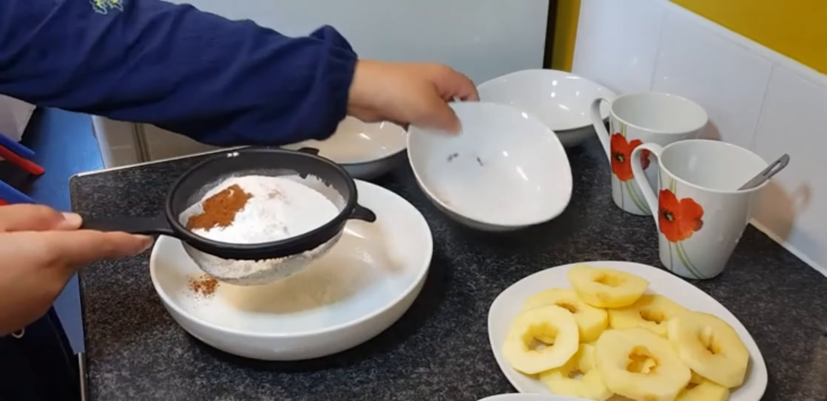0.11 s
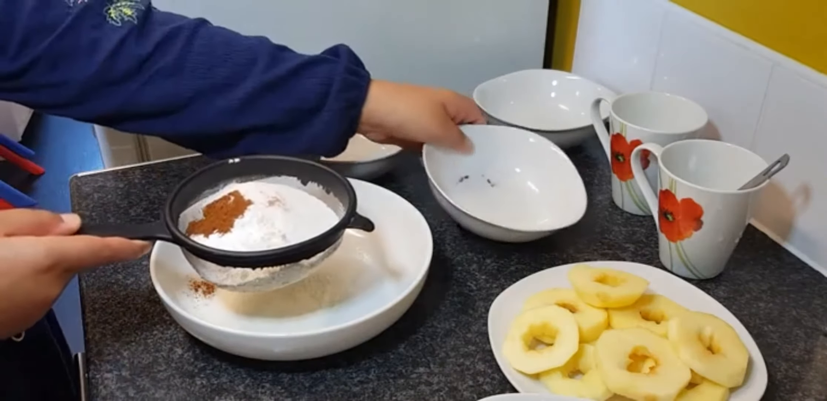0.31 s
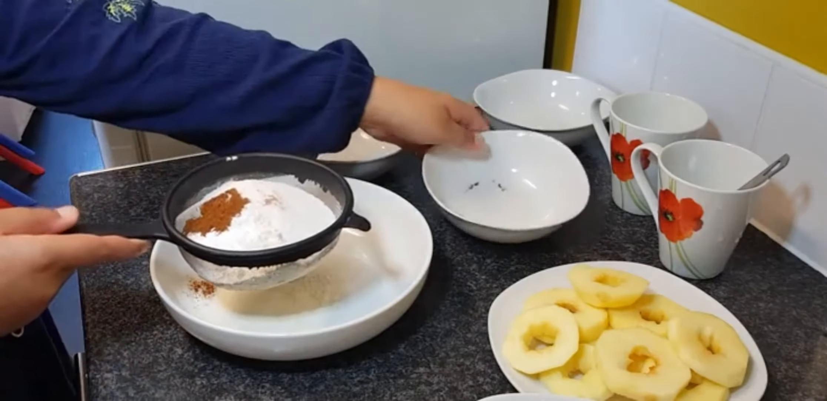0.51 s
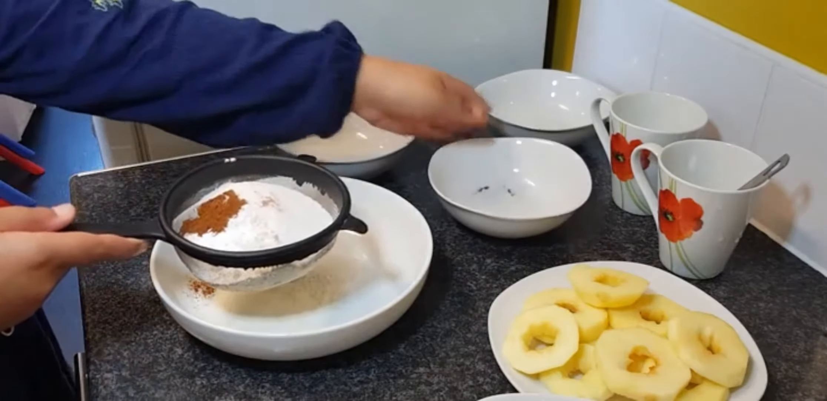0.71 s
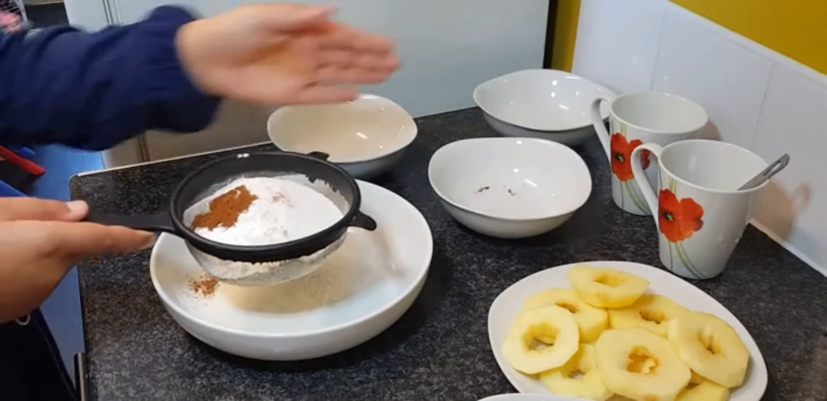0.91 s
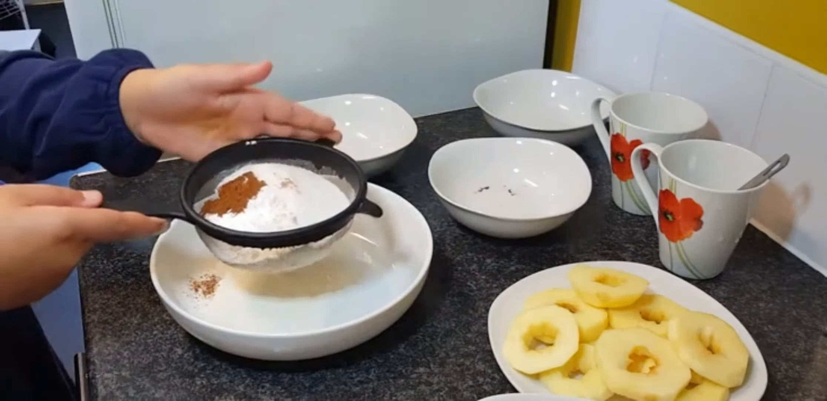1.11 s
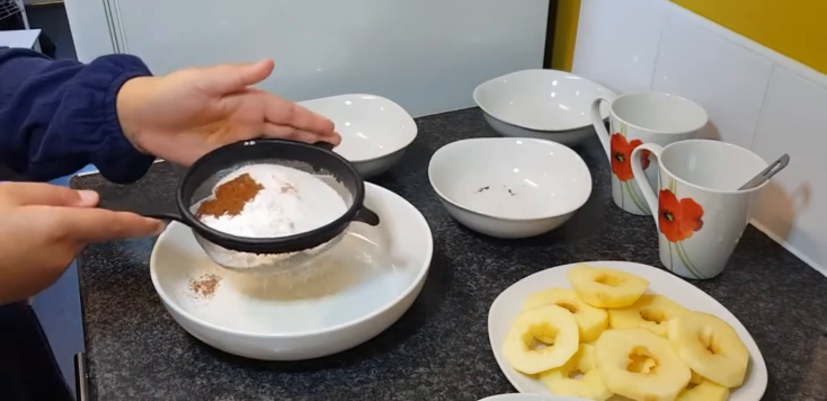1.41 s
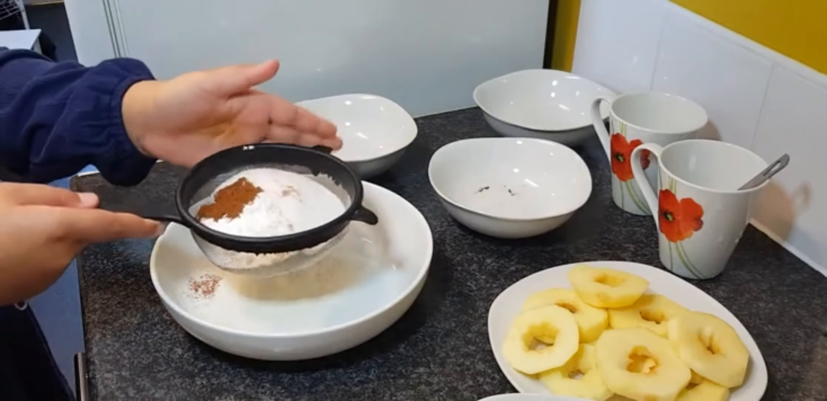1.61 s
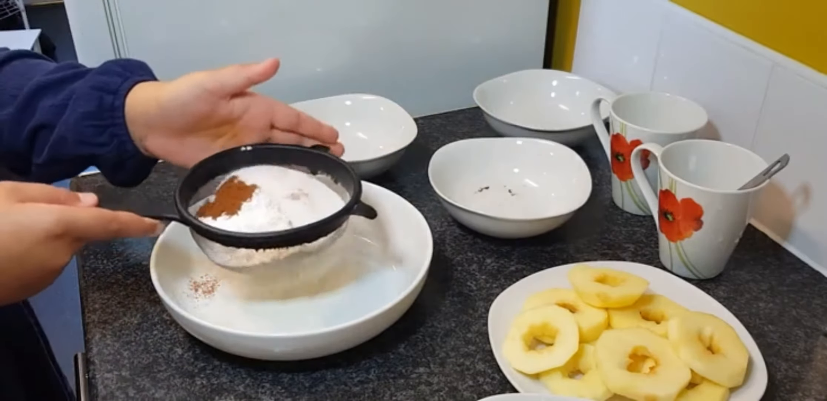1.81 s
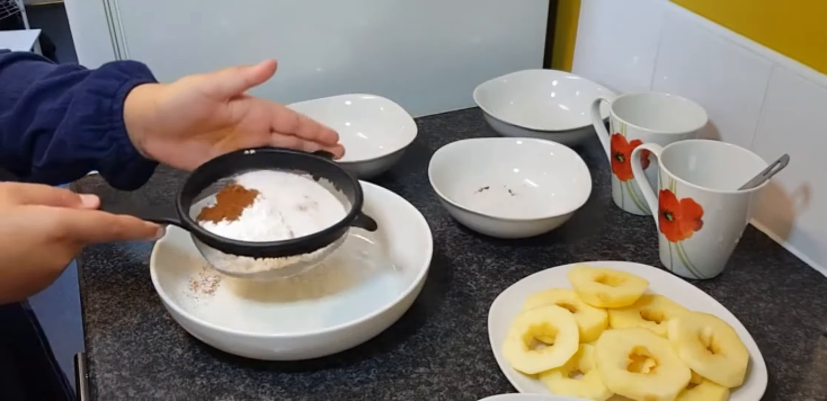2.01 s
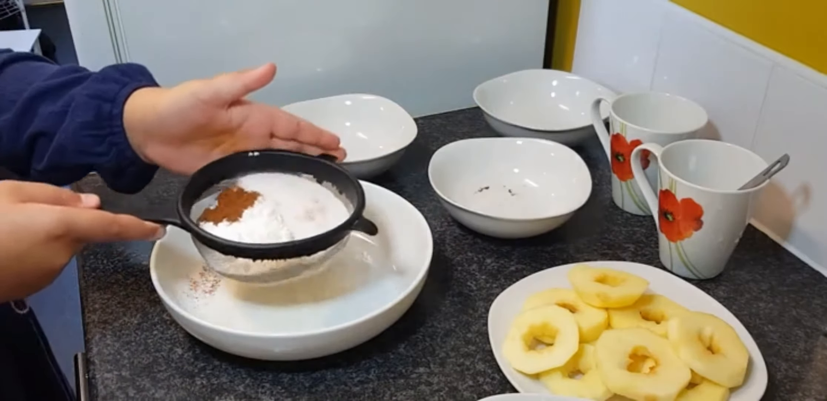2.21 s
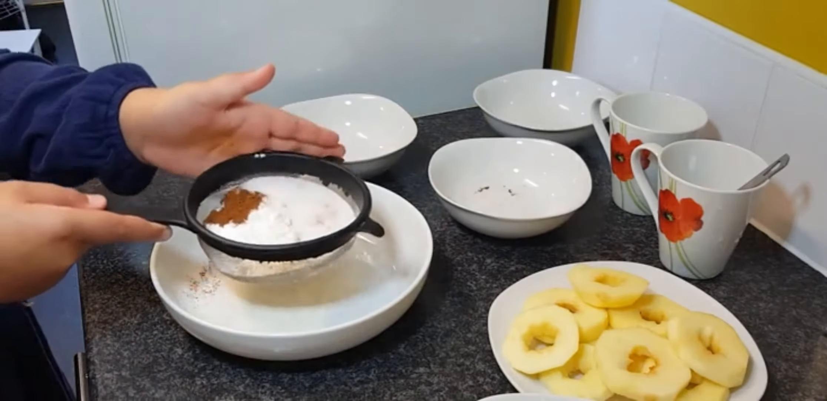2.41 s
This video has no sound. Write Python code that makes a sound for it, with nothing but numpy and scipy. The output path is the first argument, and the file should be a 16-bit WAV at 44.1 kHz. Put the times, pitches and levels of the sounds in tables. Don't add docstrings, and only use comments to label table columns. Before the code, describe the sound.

A ceramic bowl knocks firmly on a kitchen worktop, then rocks and settles with three thuds

```python
import sys
import numpy as np
from scipy import signal
from scipy.fft import rfft, irfft
from scipy.io import wavfile
from scipy.ndimage import uniform_filter1d

SR = 44100
rng = np.random.default_rng(int(sys.argv[2]) if len(sys.argv) > 2 else 0)


def boost(x):
    u = np.asarray(x, float) / 20
    return 10 ** u


def wav_out(sig):
    wavfile.write(sys.argv[1], SR, np.round(np.clip(np.atleast_2d(sig).T, -1, 1) * 32767).astype(np.int16))


N = 114660

# frequency in Hz, density in dB per Hz.
HISS_SPECTRUM = [(250, -8.5), (1200, -11.5), (1450, -3.5), (2050, -4), (2400, -16.5), (3200, -19.5),
                 (3500, -8), (15800, -18.5)]
# frequency in Hz, width in Hz, height in dB.
HISS_PEAKS = [(345, 3.2, 21.5), (1619, 57, 8.5), (1882, 84, 9.5), (4310, 330, 8.5), (4620, 1120, -7.5),
              (6508, 164, 16.5), (6900, 1000, -3.5), (8320, 1040, 7), (9710, 200, 9), (10070, 140, -15),
              (11030, 400, 12), (13500, 1900, 1), (15060, 290, 7)]
# time in seconds, gain in dB.
HISS_GAIN = [(0, 7), (.2, 8), (.3, 2.5), (0.901, 2), (1.5, 1), (2.6, 1)]
# frequency in Hz, density in dB per Hz.
RUMBLE_SPECTRUM = [(15, -49), (25, -21.5), (86, 0.5), (124, -8), (222, -7.5), (309, -18.5), (341, -13.5),
                   (370, -14.5), (1300, -25.5), (1690, -74.5), (2860, -120)]
# frequency in Hz, width in Hz, height in dB.
RUMBLE_PEAKS = [(44, 8, 11.5), (84.4, 6.07, 3), (100.5, 5.9, 18.5), (173.6, 22, 1), (212.5, 30, 5)]
# time in seconds, gain in dB.
RUMBLE_GAIN = [(0, 3), (.9, 3.5), (1.298, 2.5), (1.701, -0.5), (2.6, -0.5)]
# frequency in Hz, likeness from -1 to 1.
FLOOR_SAME = [(60, 0.89), (180, 0.97), (550, 0.67), (1650, 0.031), (4970, -0.15), (15000, -0.047)]
# frequency in Hz, left over right in dB.
FLOOR_LEAN = [(60, -1), (180, 0), (550, 2.5), (1650, 1.5), (4970, 5), (15000, -2)]
# frequency in Hz, phase lag of the right port in radians.
FLOOR_TURN = [(60, .05), (500, .2), (1500, 1.74), (15000, 2.8)]

# start in seconds, length in seconds, level in
# dB.
SWELLS = [
    (0.202, 0.015, -31),
    (0.572, 0.016, -35.5),
]
# start in seconds, strength in dB, cabinet boom in dB, bowl overtones in dB,
# part that strikes (0 rim, 1 foot, 2 heel of the foot, 3 whole foot).
KNOCKS = [
    (0.2169, -5, -7, -51, 0),
    (0.2826, -21.5, -20, -70, 0),
    (.5912, -15, -12, -43, 2),
    (0.6413, -9, -19.5, -37, 1),
    (0.6955, -9.5, -12, -38, 3),
    (0.2961, -23, -43, -79, 1),
    (.388, -46, -31, -73, 0),
    (0.27, -23, -31.5, -75, 0),
    (.307, -23.5, -27.5, -75, 1),
    (.664, -26, -30, -55, 2),
]
REST_DB = [-56, -70, -50, -45, -34, -70, -70, -70, -70, -70]
# start and length of the drop in seconds, worktop and boom in dB.
DROP = (.314, .014, -5, -11)

# frequency in Hz, level in dB, t60 in seconds.
TOP_RIM = [(142.5, -4, 0.12), (213.6, -9, 0.23), (420, -3.5, 0.05), (481.3, -2.5, 0.086),
           (622, -16.5, 0.22), (825, -3, 0.049), (1043, -8, 0.13), (1145, -6.5, 0.076), (1487, -8, 0.048),
           (1664, 0, 0.033), (2194, -11, 0.049), (2580, -14.5, 0.029)]
# frequency in Hz, level in dB, t60 in seconds.
TOP_FOOT = [(144.3, -6.5, 0.14), (217.7, -9, 0.15), (278.7, -14, 0.15), (460, -3.5, 0.092),
            (620.5, -12.5, 0.17), (653, -23, 0.12), (807, -12.5, 0.17), (1010, -18, 0.055),
            (1058, -15.5, 0.15), (1190, -3.5, 0.078), (1378, -12, 0.071), (1516, -5, 0.04),
            (1715, -23, 0.14), (2137, -16, 0.03)]
# frequency in Hz, level in dB, t60 in seconds.
TOP_HEEL = [(149, -4.5, 0.11), (220, -11, 0.19), (456, -21, 0.072), (613, -8.5, 0.14), (655.5, -10, 0.16),
            (817, -9.5, 0.1), (927, -13, 0.11), (1038, -9, .12), (1187, -3.5, .09), (1238, -9.5, 0.12),
            (1500, -17.5, 0.04), (2140, -17.5, 0.045), (2444, -25, .04)]
# frequency in Hz, level in dB, t60 in seconds.
TOP_FLAT = [(145.8, -5, 0.138), (214, -9.5, 0.14), (418.4, -6, .12), (493, -10, 0.12), (654, -12.5, 0.144),
            (814, -9, 0.13), (1012, -12, 0.12), (1197, -0.5, 0.094), (1331, -3.5, 0.079), (1450, -8, 0.046),
            (1712, -16.5, .18), (2133, -18, 0.15), (2340, -13, .03), (3550, -16, .05)]
# frequency in Hz, level in dB, t60 in seconds.
RIM_MODES = [(3620, 9, 0.13), (5420, -17.5, 0.083), (6310, -2, 0.11), (9930, -9.5, 0.12),
             (11060, -3.5, 0.13)]
# frequency in Hz, density in dB per
# Hz.
RATTLE_FOOT = [(180, -31), (300, -6.5), (1180, -4.5), (2790, -24), (6150, -41), (7370, -53), (9930, -38),
               (15500, -54)]
# frequency in Hz, density in dB per Hz.
RATTLE_RIM = [(150, -55), (250, 1), (474, -1.5), (852, -8), (1050, -5.5), (2530, -19), (3330, -29.5),
              (15500, -58.5)]
# frequency in Hz, density in dB per Hz.
GRIT_SPECTRUM = [(1500, -2.5), (2500, 1.5), (5000, -4), (8000, -9.5), (12000, -12.5), (15500, -12.5)]
# frequency in Hz, level in dB, t60 in seconds.
BOOM_MODES = [(76.55, -2.5, 0.31), (92.5, -5, 0.21)]
# frequency in Hz, level in dB, t60 in seconds.
BOWL_MODES = [(6019, -6, .25), (6270, -5, .25), (6767, -12, .15), (9803, 0, .3), (10100, -1, .22),
              (13750, -10, .15), (14300, -8, .18), (15050, -8, .18)]
# frequency in Hz, level in dB, t60 in seconds.
REST_MODES = [(1168, 0, .95), (1130, -3, .72), (2503, -9, .52)]

# frequency in Hz, left over right in dB.
PORT_LEAN = [(70, -3.5), (200, 1.5), (400, 1), (1200, 4), (2200, -0.5), (4500, 1), (10000, -2)]
# frequency in Hz, phase between the ports in radians.
PORT_TURN = [(70, 0.086), (400, 0.42), (1200, 1.54), (2500, 1.6), (10000, 1.87)]
# frequency in Hz, t60 in seconds.
KITCHEN_T60 = [(80, 0.68), (400, 0.25), (1100, 0.37), (3000, 0.4), (8000, 0.2)]
# frequency in Hz, gain of the kitchen in dB.
KITCHEN_COLOUR = [(100, 2.5), (250, -8.5), (450, 3), (1200, -0.5), (3000, -8.5), (10000, 0)]
# frequency in Hz, likeness of the reverberation at the two ports.
KITCHEN_SAME = [(60, 0.935), (180, 0.78), (550, 0.56), (1650, -0.15), (4970, 0.19), (15000, 0.95)]
# time in seconds, gain in dB.
DUCK = [(0, 0), (.31, 0), (.34, -3), (.55, -3), (.58, 0), (2.6, 0)]


def evened(x):
    return x / np.sqrt(np.mean(x ** 2) + 1e-20)


def read(points, hz):
    f, value = np.transpose(points)
    return np.interp(np.log(hz + 1), np.log(f + 1), value)


def fader(points):
    return boost(np.interp(np.arange(N) / SR, *np.transpose(points)))


def colour(x, points):
    return irfft(rfft(x) * boost(read(points, np.fft.rfftfreq(len(x), 1 / SR))), len(x))


def add(mix, s, sound):
    part = mix[round(s * SR):][:len(sound)]
    part += sound[:len(part)]


def room_floor(points, peaks, low_hz, high_hz, patchy_db):
    frames, hz = N // 1024 + 5, np.fft.rfftfreq(4096, 1 / SR)
    a, b, c, d, patches = rng.standard_normal((frames, 2049, 5)).T
    patches = uniform_filter1d(patches, size=30, axis=0)
    patches = evened(uniform_filter1d(patches, size=3, axis=1))
    db = read(points, hz) + sum(g / (1 + (2 * (hz - f) / w) ** 2) for f, w, g in peaks)
    same = np.clip(read(FLOOR_SAME, hz), 0, 1)[:, None]
    left = a + 1j * b
    right = same * left + np.sqrt(1 - same ** 2) * (c + 1j * d)
    right = right * (boost(-read(FLOOR_LEAN, hz)) * np.exp(-1j * read(FLOOR_TURN, hz)))[:, None]
    band = ((hz > low_hz) & (hz < high_hz))[:, None]
    z = np.array([left, right]) * boost(db[:, None] + patchy_db * patches) * band
    return evened(signal.istft(z, nperseg=4096, noverlap=3072)[1][:, :N])


def appliance_hiss():
    return boost(-57.5) * fader(HISS_GAIN) * room_floor(HISS_SPECTRUM, HISS_PEAKS, 200, 16100, patchy_db=0.3)


def room_rumble():
    return boost(-54) * fader(RUMBLE_GAIN) * room_floor(RUMBLE_SPECTRUM, RUMBLE_PEAKS, 15, 1600, patchy_db=0.6)


def swell(s, length, db):
    noise = evened(colour(rng.standard_normal(4096), RATTLE_FOOT))[:round(length * SR)]
    return boost(db) * noise * np.linspace(.2, 1, len(noise))


def ring(modes, t, spread):
    hz, db, t60 = np.transpose(modes)[:, :, None]
    phase = np.pi + spread * rng.standard_normal((len(modes), 1))
    sines = boost(db - 60 * t / t60) * np.sin(2 * np.pi * hz * t + phase)
    return sines.sum(0) / np.sqrt((boost(db) ** 2).sum())


def worktop(part, t):
    if part > .5:
        return ring([TOP_FOOT, TOP_HEEL, TOP_FLAT][round(part) - 1], t, spread=0.77)
    return ring(TOP_RIM, t, spread=0.48) + boost(-29) * ring(RIM_MODES, t, spread=2.9)


def rattle_and_grit(part, t):
    rattle = evened(colour(rng.standard_normal(SR), RATTLE_FOOT if part > .5 else RATTLE_RIM))
    rattle = rattle * (boost(-9 - 60 * t / 0.19) + boost(-10.5 - 60 * t / 0.018))
    grit = evened(colour(rng.standard_normal(SR), GRIT_SPECTRUM))
    grit = grit * boost(-28.5 - 60 * t / 0.18) * (1 - np.exp(-t / .004))
    clumps = evened(uniform_filter1d(rng.standard_normal(SR), size=round(.005 * SR)))
    return boost(1.5 * clumps) * (rattle + grit)


def bowl(ring_db, rest_db, t):
    overtones = ring(BOWL_MODES, t, spread=0.25) * (1 - np.exp(-t / .0099))
    return boost(rest_db) * ring(REST_MODES, t, spread=0.45) + boost(ring_db) * overtones


def knock(s, db, boom_db, ring_db, part, rest_db):
    t = np.arange(SR) / SR
    rise_s = .0028 if part > .5 else .00094
    rise = np.sin(np.pi / 2 * np.minimum(t / rise_s, 1))
    drop_s, drop_length, drop_top_db, drop_boom_db = DROP
    dropped = np.clip((s + t - drop_s) / drop_length, 0, 1) * (s < drop_s)
    blow = rise * boost(db + drop_top_db * dropped) * (worktop(part, t) + rattle_and_grit(part, t))
    boom = -boost(boom_db + drop_boom_db * dropped) * ring(BOOM_MODES, t, spread=0.065)
    boom = boom * (1 - np.exp(-t / .016))
    return blow, boom + rise * bowl(ring_db, rest_db, t)


def ports(x):
    hz = np.fft.rfftfreq(N, 1 / SR)
    half = boost(read(PORT_LEAN, hz) / 2) * np.exp(-.5j * read(PORT_TURN, hz))
    return irfft(rfft(x) * np.array([half, 1 / half]), N)


def early(x):
    taps = np.zeros((2, 1024))
    at = np.clip(rng.uniform(.1, 1, (2, 6)) * .01 * SR, 1, 1023).astype(int)
    np.put_along_axis(taps, at, rng.choice([-1., 1.], at.shape) / np.sqrt(6), 1)
    high = signal.sosfilt(signal.butter(2, 450, "high", fs=SR, output="sos"), x)
    return boost(-6) * signal.fftconvolve(high[None], taps, axes=1)[:, :N]


def kitchen(x):
    taps = np.zeros((2, SR))
    at = np.arange(200, SR - 20, 20) + rng.integers(0, 20, (2, (SR - 201) // 20))
    np.put_along_axis(taps, at, rng.choice([-1., 1.], at.shape), 1)
    hz, t, z = signal.stft(taps, SR, nperseg=512)
    same = np.clip(read(KITCHEN_SAME, hz), 0, 1)[:, None]
    z = np.array([z[0], same * z[0] + np.sqrt(1 - same ** 2) * z[1]])
    tail = signal.istft(z * boost(-60 * t / read(KITCHEN_T60, hz)[:, None]), SR, nperseg=512)[1]
    tail *= np.arange(tail.shape[1]) > 200
    tail = tail / np.linalg.norm(tail[0])
    return signal.fftconvolve(colour(x, KITCHEN_COLOUR)[None], tail, axes=1)[:, :N]


def scene():
    background = appliance_hiss() + room_rumble()
    near, low = np.zeros((2, N))
    for row in SWELLS:
        add(near, row[0], swell(*row))
    for row, rest_db in zip(KNOCKS, REST_DB):
        blow, boom_and_bowl = knock(*row, rest_db)
        add(near, row[0], blow)
        add(low, row[0], boom_and_bowl)
    room = boost(-8.5) * fader(DUCK) * kitchen(near)
    return ports(near + low) + early(near) + room + background


def top_cut(x):
    return signal.sosfilt(signal.butter(12, 15840, fs=SR, output="sos"), x)


def record(dry):
    ceiling = 1.25
    cut = signal.sosfilt(signal.butter(3, 55, "high", fs=SR, output="sos"), dry)
    limited = ceiling * np.tanh(cut / ceiling)
    edge = signal.firwin(511, 15800, window=("kaiser", 9), fs=SR)[None]
    return top_cut(signal.oaconvolve(limited, edge, "same"))


dry = scene()
out = record(dry)
wav_out(out)
```